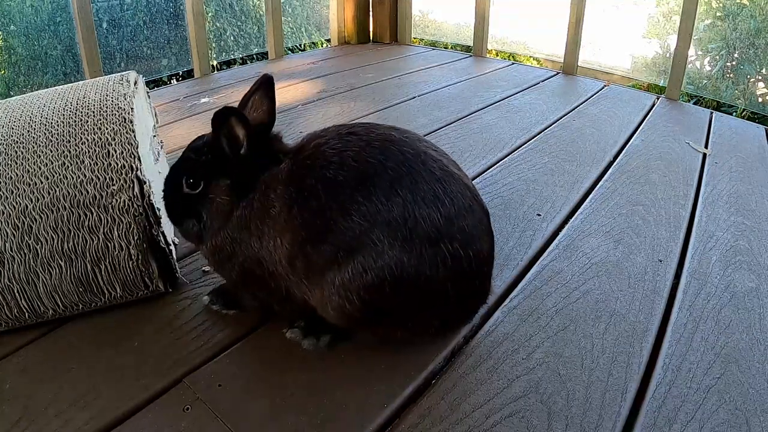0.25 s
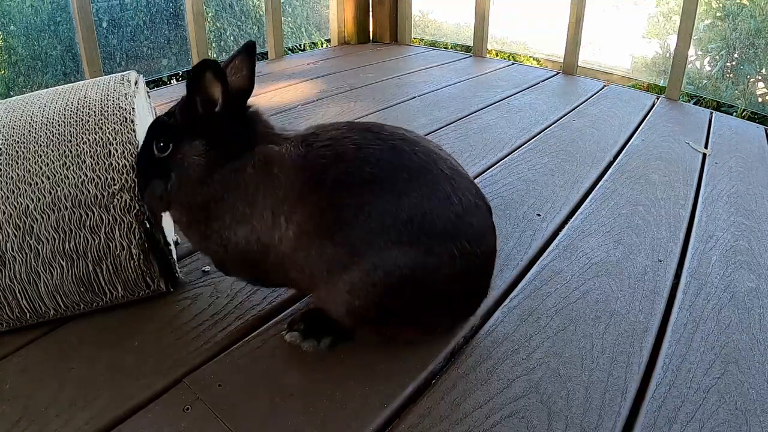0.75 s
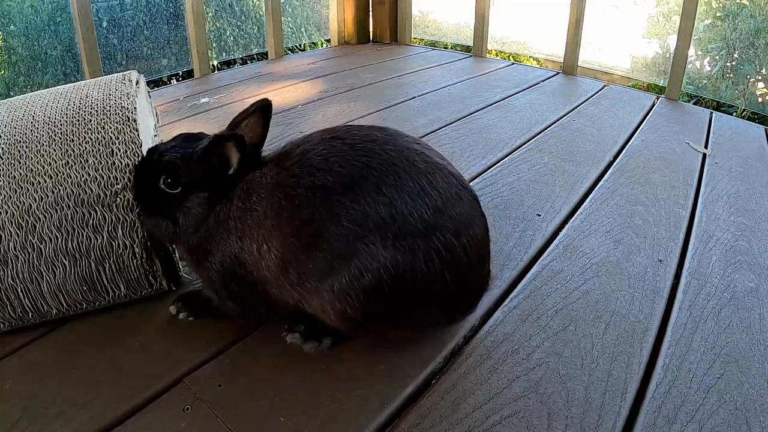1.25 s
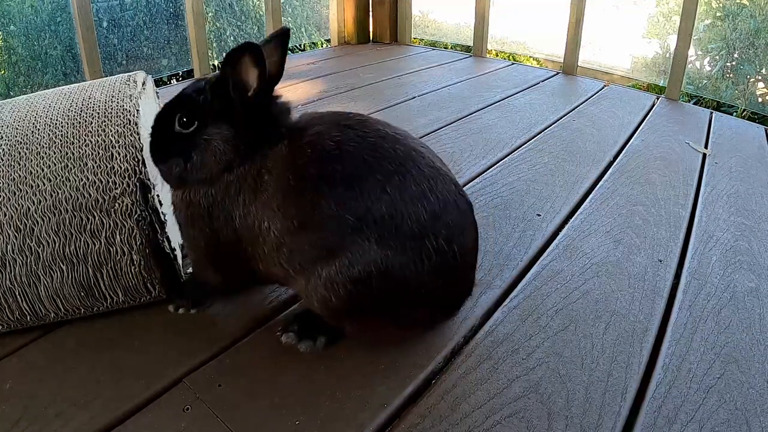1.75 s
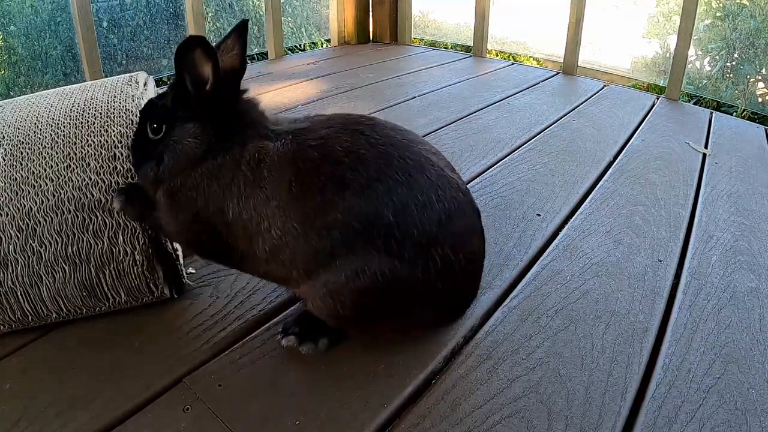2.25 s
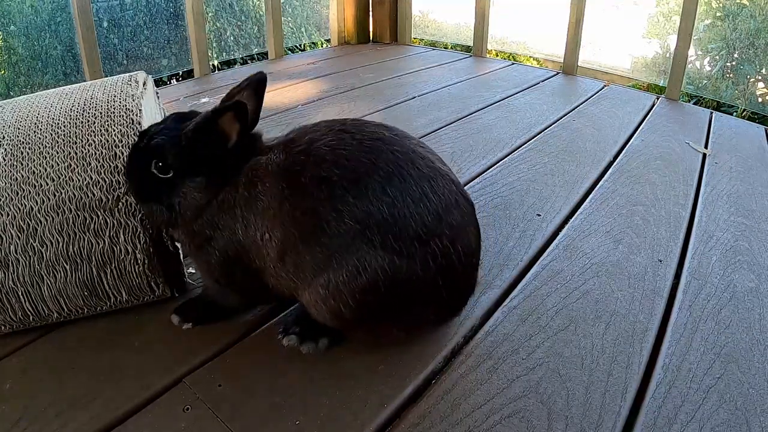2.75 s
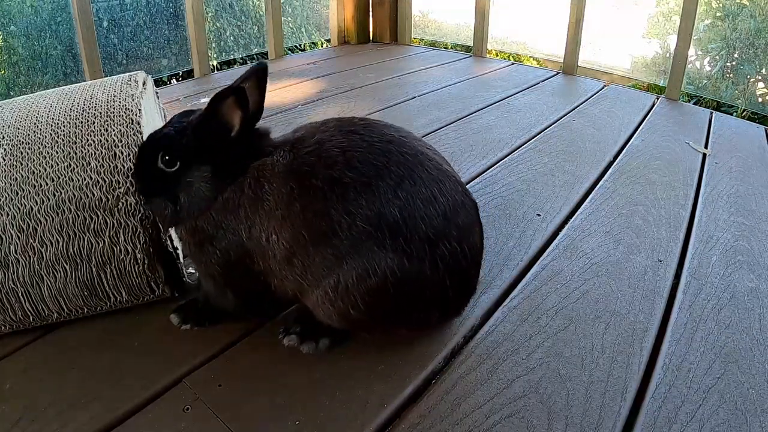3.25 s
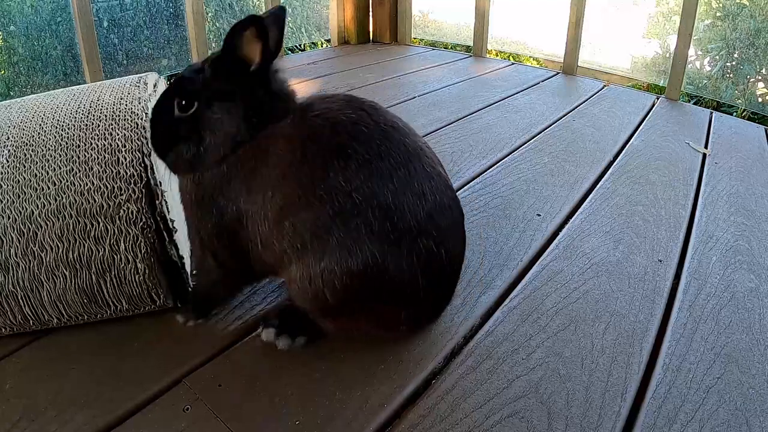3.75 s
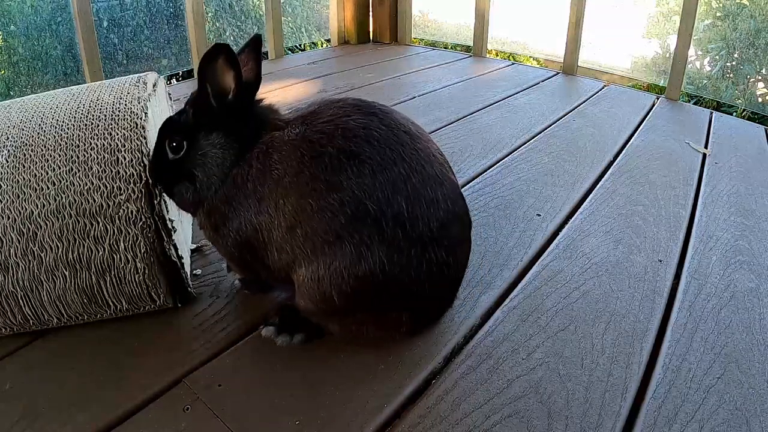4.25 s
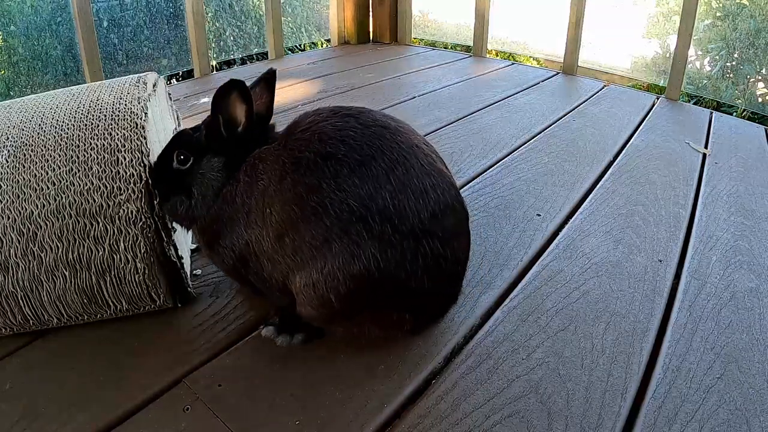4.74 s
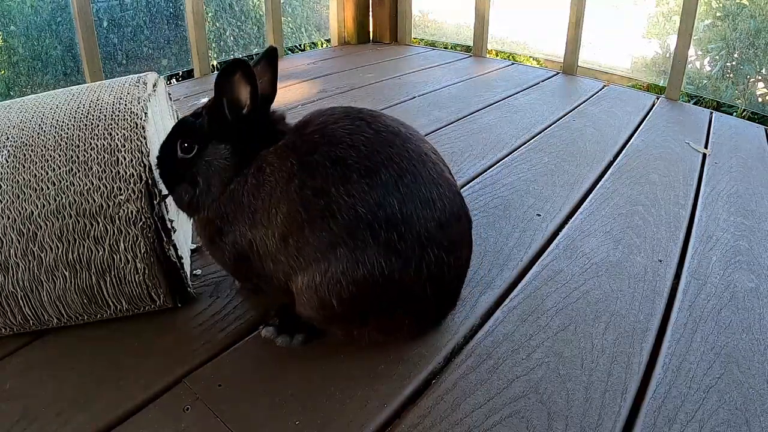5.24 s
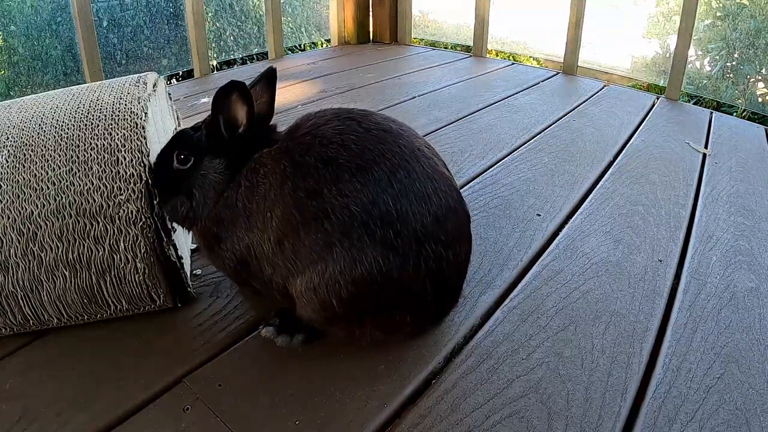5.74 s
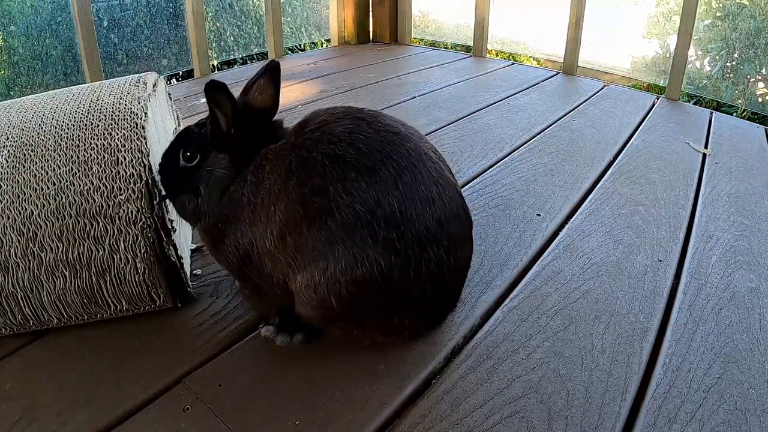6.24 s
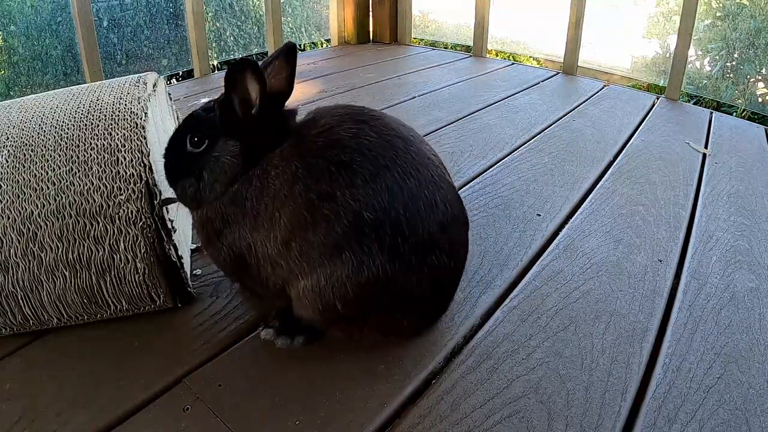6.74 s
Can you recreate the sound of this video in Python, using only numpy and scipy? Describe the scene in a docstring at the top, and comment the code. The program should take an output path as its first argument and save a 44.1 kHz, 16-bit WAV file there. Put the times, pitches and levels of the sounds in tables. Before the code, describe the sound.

A rabbit works at a hollow corrugated cardboard roll on an enclosed wooden deck. A brief scratch and soft rustle lead into a rapid burst of clawing with crisp snaps, then a lull, a second fast burst, and a few thumps on the boards. Afterwards only isolated light bites and knocks remain over a low outdoor hush. The microphone is close but muffled inside a closed case, so everything sounds boxy and dull.

```python
"""Rabbit digging at a cardboard roll

A rabbit claws and tears at a roll of corrugated cardboard on an enclosed wooden deck.
Each stroke is a shower of random fibre slips ringing the hollow roll; flutes snap with short bright clicks.
Thumps ring the deck boards as decaying sines; soft rustles and the brush of fur are shaped noise.
Behind lie a quiet outdoor hush and faint machine tones, all heard by a camera in a closed, muffling case."""
import sys
import numpy as np
from scipy import signal
from scipy.fft import rfft, irfft
from scipy.io import wavfile
from scipy.ndimage import uniform_filter1d

SR = 44100
rng = np.random.default_rng(int(sys.argv[2]) if len(sys.argv) > 2 else 0)


def master_out(mix):
    """Clip the mix to full scale and print it as 16-bit PCM to the path in sys.argv[1]."""
    frames = np.transpose(np.atleast_2d(mix))
    ceiling = np.clip(frames, -1, 1)
    pcm = np.round(ceiling * 32767).astype(np.int16)
    wavfile.write(sys.argv[1], SR, pcm)


N = 308259
SIZE = 4096  # samples in a filter's frequency grid
HZ = np.maximum(np.fft.rfftfreq(SIZE, 1 / SR), 1)
TIME = np.arange(N) / SR

# Boom of the roll at a 0 dB stroke, and its growth in dB per dB: light touches barely move it.
HOLLOW_DB, HOLLOW_GROWTH = 4, 0.1
# Paw and tooth strokes: pawing at the rim, two bouts of digging with nibbling and a tug between,
# then sliding down, nosing at the edge and single bites.
# Each row: landing time in seconds, drag length in seconds, tap level in dB, drag level in dB, grit in dB.
STROKES = [ (0.045, 0.031, -52, -33, -2), (0.115, 0.018, -30, -22, -5), (0.564, .012, -30, -37, -12),
           (0.579, .01, -26.5, -23, -6), (0.624, 0.028, -23, -30, -5.5), (0.699, 0.035, -19.5, -22, -3.5),
           (0.748, .035, -24.5, -25, -5), (0.826, 0.015, -22, -17.5, -6), (0.872, 0.013, -23.5, -22, -4.5),
           (0.918, 0.013, -23.5, -32.5, -4), (0.985, 0.039, -32.5, -26.5, -4),
           (1.046, .014, -29.5, -23, -3), (1.128, 0.0077, -35.5, -42.5, 3),
           (1.319, 0.069, -45.5, -47.5, -4), (1.557, 0.022, -43, -41.5, -4.5), (1.7, 0.019, -48, -28, -2),
           (1.772, 0.012, -26, -24.5, -4.5), (1.976, 0.0085, -43.5, -46, -0.5),
           (2.022, 0.0085, -31.5, -31, -4.5), (2.064, 0.014, -36, -18.5, -1.5),
           (2.096, 0.014, -39, -24.5, -1.5), (2.166, 0.0089, -31, -30, -4.5),
           (2.2125, 0.013, -18.5, -19, -4), (2.25, 0.013, -30, -22, -7.5), (2.288, 0.015, -31, -24.5, -5.5),
           (2.354, 0.034, -23, -31, -14.5), (2.423, 0.017, -25.5, -28.5, -3.5),
           (2.451, 0.012, -25.5, -20.5, -5), (2.6, 0.069, -53, -42.5, 7.5), (2.672, .012, -44, -31, -13),
           (2.744, 0.023, -36, -40, -11.5), (2.834, 0.06, -56, -33.5, -6.5), (2.91, .008, -41, -41.5, 4.5),
           (3.213, 0.035, -49, -34, -3), (3.623, 0.079, -48, -37.5, -5.5), (3.822, 0.0065, -22.5, -31, -7),
           (5.15, 0.041, -40.5, -34, -1), (6.179, 0.02, -31.5, -45.5, 1), (6.704, .03, -47, -36, 2),
           (6.782, 0.0095, -24.5, -30, -6)]


def scratching(slips_per_s=2000, scatter_db=3.5, rub=0.15, chatter_db=2,
               hiss_db=-59, hiss_growth=0.41, size=500):
    """A claw drags over the paper: fibres slip at random, harder as the stroke bites, over a fine rub."""
    track, hiss_power = np.zeros((2, N)), np.zeros(N)
    t = np.arange(-0.04, 0.22, 1 / SR)
    for s, drag_s, tap_db, drag_db, grit_db in STROKES:
        db = max(tap_db, drag_db)
        force = stroke_force(t, drag_s, tap_db - db, drag_db - db)

        jolt_db = scatter_db * np.clip(rng.standard_normal(len(t)), -2, 2)
        jolts = rng.choice([-1, 1], len(t)) * undb(jolt_db)
        slipping = rng.random(len(t)) < slips_per_s / SR
        slips = unit(jolts * slipping) + rub * rng.standard_normal(len(t))
        # over about 11 ms the slips release what the claw puts in
        slips /= np.sqrt(uniform_filter1d(slips ** 2, size) + 1e-9)
        # the claw catches and skips on the ridges
        slips *= undb(chatter_db * wander(t - t[0], 0.003))
        drag = unit(force * slips) * np.sqrt(np.mean(force ** 2))

        spot = cardboard(HOLLOW_DB + HOLLOW_GROWTH * db, grit_db)
        scrape = signal.fftconvolve(drag[None], spot, axes=1)
        # the claw's force sets the stroke's energy, however the slips happen to fall
        scrape *= np.linalg.norm(force) * np.linalg.norm(spot) / np.linalg.norm(scrape)
        add(track, s + t[0], undb(db) * scrape)
        # fur and paper hiss even under a light touch, so the hiss grows more slowly than the stroke
        hiss_gain = undb(hiss_db + hiss_growth * (db + grit_db))
        add(hiss_power, s + t[0], (hiss_gain * drag) ** 2)

    colour = response(spectrum([(1500, -19), (5000, -4), (7000, 11), (9000, -5.5), (12000, 7), (15500, -34)]))
    hiss = np.sqrt(hiss_power) * rng.standard_normal((2, N))
    return track + convolve(hiss, colour / np.linalg.norm(colour))


TAP_ATTACK_S, TAP_FALL_S = 0.0022, 0.01
SWELL_SHARE = 0.56  # a drag's rise time, as a share of its length
RELEASE_S, RELEASE_SHARE = 0.013, 0.26  # longer drags also let go more slowly


def stroke_force(t, drag_s, tap_db, drag_db):
    """The claw lands with a tap, bites harder as it drags, then lets go."""
    tap = undb(tap_db) * pulse(t, TAP_ATTACK_S, TAP_FALL_S)
    release_s = RELEASE_S + RELEASE_SHARE * drag_s
    drag = undb(drag_db) * pulse(t - drag_s, SWELL_SHARE * drag_s, release_s)
    return np.hypot(tap, drag)


# Tone of the cardboard as heard inside the case, before levelling.
# Each row: frequency in Hz, gain in dB.
CARDBOARD_TONE = [(25, -53), (70, -11), (170, -9.5), (340, -12.5), (500, -5), (800, -9), (1070, 2),
                  (1430, -11), (1950, -13), (2350, -26), (3300, -9), (5300, -15.5), (8500, -41.5),
                  (12000, -44), (15500, -63.5)]
# Resonances and notches of the roll and case.
# Each row: centre in Hz, width in Hz, gain in dB.
ROLL_RESONANCES = [(541.6, 70, 5), (757, 37, 5.5), (830, 22, -6), (893, 60, 3.5), (1097, 62, 4),
                   (1267, 58, 3), (2422, 200, 9), (3150, 280, 3.5), (3770, 110, -5.5), (3950, 300, -1.5),
                   (4280, 250, -10.5), (4540, 230, -0.5), (5700, 90, -11.5)]


def cardboard(hollow_db, grit_db, ripple_db=2.0, ripple_hz=45, scatter=0.73, scatter_s=0.0013, size=40):
    """Stereo response of one spot: broad faces boom, torn edges are gritty, each favours its own partials."""
    db = spectrum(CARDBOARD_TONE) + bumps(ROLL_RESONANCES)
    db -= 10 * np.log10(np.mean(undb(db) ** 2))
    db += spectrum([(120, 0.024), (350, hollow_db), (650, hollow_db), (950, 0), (1400, 0.014),
                    (2600, grit_db), (5000, grit_db), (9000, 0.95 * grit_db)])
    direct = response(db + ripple_db * wander(HZ, ripple_hz))

    # short waves bounce among the flutes and reach the two ports by different paths
    paths = diffuse(SIZE, split_hz=2350) * np.exp(-TIME[:SIZE] / scatter_s)
    paths /= np.sqrt(np.sum(paths ** 2) / 2)
    paths = convolve(paths, response(spectrum([(700, -24.5), (2500, 1.5), (8000, 3)])))
    spread = rfft(scatter * paths, axis=1) + 1
    # the bounces smear a click in time but leave each broad band its energy
    spread /= np.sqrt(uniform_filter1d(abs(spread) ** 2, size, axis=1))
    return convolve(irfft(spread, axis=1)[:, :SIZE // 2], direct)


# Flutes snapping and claws catching.
# Each row: start in seconds, level in dB, hollow boom in dB, grit in dB.
SNAPS = [(0.624, -34, -2, 4), (0.693, -36, -17, 12), (0.7025, -26.5, -1, 5.5), (0.708, -20.5, 6.5, -13),
         (0.731, -20.5, -17, -15), (0.7754, -23.5, 6.5, -2), (0.82, -28, -14, 5.5), (0.827, -25.5, -2, 7),
         (0.8345, -24.5, -9, 9.5), (0.9186, -18.5, 4, -26), (1.02, -34, 16.5, 9), (1.6989, -27, 3, 14),
         (2.063, -30, -15, 11), (2.0709, -32.5, 16.5, 17.5), (2.095, -20, -16, -3), (2.2244, -24, 10.5, 3),
         (2.305, -23, -3, -1), (2.3521, -28, 9, 0.5), (2.368, -28.5, 5, -2.5), (2.8527, -23, 8.5, -6),
         (2.9141, -35.5, 14, -6), (3.09, -56, 8, 14.5), (3.8219, -30.5, 0, -13.5), (5.187, -44, 10, 3),
         (6.783, -37, 16, -6)]


def snapping(ring_s=0.0051, tear=0.65, tear_s=0.0017):
    """A flute gives way: one push on the cardboard, and its last fibres part brightly right after."""
    track, t = np.zeros((2, N)), TIME[:SR // 100]
    bright = signal.butter(2, 1800, "highpass", fs=SR, output="sos")
    for s, db, hollow_db, grit_db in SNAPS:
        fibres = signal.sosfilt(bright, rng.standard_normal(len(t)) * np.exp(-t / tear_s))
        push = tear * fibres / np.linalg.norm(fibres)
        push[0] += 1
        snap = convolve(cardboard(hollow_db, grit_db), push / np.linalg.norm(push))
        # sets the energy as if the level were held for ring_s
        add(track, s, undb(db) * np.sqrt(ring_s * SR) * snap)
    return track


# Paws, body and roll landing on the boards.
# Each row: start in seconds, level in dB before the boards' gain, contact time constant in seconds.
THUMPS = [(0.138, -39, 0.00089), (0.768, -35.5, 0.0014), (1.779, -28, 0.0029), (1.895, -31, 0.0091),
          (2.302, -40, .0008), (2.912, -43.5, 0.00011), (3.255, -40.5, 0.0017), (3.725, -37, 0.0021),
          (3.789, -37, 0.0024), (3.822, -35, 0.00058), (3.84, -26.5, 0.0036), (5.2, -40.5, 0.00053),
          (5.443, -46, 0.003), (6.176, -40, 0.0023), (6.78, -41, 0.0003)]
# Ringing modes of the deck boards.
# Each row: nominal frequency in Hz, relative level in dB, 60 dB decay time in seconds.
BOARD_MODES = [(31, -10.5, .35), (56.9, -6, 0.44), (66.67, 3, 0.27), (85.5, 1, 0.3), (121, -3, 0.19),
               (156.3, -6.5, 0.21), (219, -1.5, 0.15), (259.4, 7.5, 0.068), (291.8, -0.5, 0.16),
               (386.5, -3.5, .13)]


def thumping(spot_db=1, detune=0.021, gain_db=8, build_cycles=0.59):
    """Blows ring the deck boards; the bass builds up late, and longer contact favours the lowest modes."""
    track, t = np.zeros(N), TIME[:SR // 2]
    for s, db, contact_s in THUMPS + rocking():
        ring = np.zeros(len(t))
        for hz, mode_db, t60 in BOARD_MODES:
            # each landing spot favours and detunes the modes a little differently
            favour, shift = rng.standard_normal(2)
            envelope = undb(mode_db + spot_db * favour - 60 * t / t60)
            build_up = 1 - np.exp(-t * hz / build_cycles)
            ring += envelope * build_up * np.sin(2 * np.pi * hz * (1 + detune * shift) * t)
        push = np.exp(-t / max(contact_s, 1e-4))
        thump = signal.fftconvolve(ring, push / push.sum())[:len(t)]
        add(track, s, undb(db + gain_db) * thump)
    return track


# Thump of a 0 dB stroke before the boards' gain, its growth in dB per dB of stroke, contact time.
ROCK_DB, ROCK_GROWTH, ROCK_CONTACT_S = -29, 0.62, 0.0027


def rocking():
    """Each stroke knocks the roll against the deck at its stronger part: more rows in the form of THUMPS."""
    rows = []
    for s, drag_s, tap_db, drag_db, _ in STROKES:
        peak_s = s + drag_s * (drag_db > tap_db)
        rows.append((peak_s, ROCK_DB + ROCK_GROWTH * max(tap_db, drag_db), ROCK_CONTACT_S))
    return rows


RUSTLE_ATTACK_S, RUSTLE_SAG_DB_PER_S, RUSTLE_RELEASE_S = 0.0023, 34, 0.025
# Soft, hoarse rustles at the roll.
# Each row: start in seconds, length in seconds, opening level in dB.
RUSTLES = [(0.324, .2, -35.5), (3.157, 0.012, -48)]
# Colour of the rustle, before levelling.
# Each row: frequency in Hz, gain in dB.
RUSTLE_COLOUR = [(100, -31), (420, -26), (600, -20.5), (880, -19.5), (1020, -2), (1300, -6.5),
                 (1450, -26.5), (1800, -22), (2400, -42.5), (3100, -26), (4000, -36.5), (5300, -30.5),
                 (7000, -63), (15000, -78)]
# Narrow resonances of the rustle.
# Each row: centre in Hz, width in Hz, gain in dB.
RUSTLE_PEAKS = [(556, 34, 11.5), (735, 44, 14), (1020, 36, 9), (1205, 44, 6), (1326, 31, 7), (1570, 55, 5),
                (1780, 60, 5.5), (3070, 98, 4.5), (4150, 150, 8)]


def rustling():
    """Soft, hoarse noise ringing a few narrow resonances: it starts quickly, sags and stops."""
    colour = response(spectrum(RUSTLE_COLOUR) + bumps(RUSTLE_PEAKS))
    noise = unit(convolve(rng.standard_normal(N), colour)[0])
    level = 0
    for s, length_s, db in RUSTLES:
        t = TIME - s
        held = np.clip(t, 0, length_s)
        sag = undb(db - RUSTLE_SAG_DB_PER_S * held)
        level = level + sag * pulse(t - held, RUSTLE_ATTACK_S, RUSTLE_RELEASE_S)
    return noise * level


# Brush level at a 0 dB stroke without grit, and its growth in dB per dB of stroke and grit.
BRUSH_DB, BRUSH_GROWTH = -47, 0.4
BRUSH_RISE_S, BRUSH_FALL_S = 0.02, 0.016
# Colour of fur on paper, before levelling.
# Each row: frequency in Hz, gain in dB.
BRUSH_COLOUR = [(1500, -22), (3300, 1), (5200, 6), (8500, -11), (12000, -18.5), (15500, -31)]


def brushing(flutter_db=3.0):
    """Fur sweeps over the paper around each stroke: a faint, bright swish, stronger on gritty edges."""
    power = 0
    for s, drag_s, tap_db, drag_db, grit_db in STROKES:
        gain = undb(BRUSH_DB + BRUSH_GROWTH * (max(tap_db, drag_db) + grit_db))
        sweep = pulse(TIME - s - drag_s / 2, BRUSH_RISE_S, BRUSH_FALL_S)
        power = power + (gain * sweep) ** 2
    noise = unit(convolve(diffuse(N), response(spectrum(BRUSH_COLOUR))))
    return noise * np.sqrt(power) * undb(flutter_db * wander(TIME, 0.0074))


DECK_T60_S, DECK_DB = 0.35, -11


def enclosure(x, treble_db=-3):
    """Floor, posts and roof return a short, slightly dulled echo, made from decaying noise."""
    t = np.arange(SR // 2) / SR
    tail = diffuse(len(t)) * undb(-60 * t / DECK_T60_S) * (1 - np.exp(-t / 0.0044))
    tail /= np.sqrt(np.sum(tail ** 2) / 2)
    tail = convolve(tail, response(spectrum([(1000, 0), (6000, treble_db)])))
    return undb(DECK_DB) * convolve(x, tail)


# A distant machine.
# Each row: start in seconds, mean frequency in Hz, level in dB, waver in dB.
HUM = [(0, 120, -59.5, 3.5), (0, 362, -70.5, -1.5), (3.9, 311, -64, 4)]


def humming(drift_hz=2):
    """Faint, distant machine tones: sines that waver in pitch and level."""
    out = 0
    for start, hz, db, waver_db in HUM:
        phase = 2 * np.pi * np.cumsum(hz + drift_hz * wander(TIME, 0.12)) / SR
        running = np.clip((TIME - start) / 0.11, 0, 1)
        level = undb(db + waver_db * wander(TIME, 0.15))
        out = out + running * level * np.sqrt(2) * np.sin(phase)
    return out


HUSH_DB = -50.5  # air before its rumble flickers
# Colour of the outdoor hush inside the case, before levelling.
# Each row: frequency in Hz, relative density in dB per Hz.
HUSH_COLOUR = [(25, -5.5), (80, 2.5), (110, -8.5), (150, -3), (255, -10), (330, -13.5), (480, -24),
               (850, -27.5), (1120, -9.5), (1500, -26), (2400, -39.5), (3400, -30), (4200, -37.5),
               (5300, -35), (8500, -64.5)]


def hush(flicker_db=2, hiss_db=-96):
    """Distant outdoor air and uneven rumble, gently swelling, over faint microphone hiss."""
    air = unit(convolve(diffuse(N, split_hz=3400), response(spectrum(HUSH_COLOUR))))
    rumble = signal.sosfilt(signal.butter(2, 350, fs=SR, output="sos"), air)
    air = air + rumble * (undb(flicker_db * wander(TIME, 0.051)) - 1)
    swell_db = 0.6 * wander(TIME, 0.4)
    return air * undb(HUSH_DB + swell_db) + undb(hiss_db) * rng.standard_normal((2, N))


# Difference between the two microphone ports.
# Each row: frequency in Hz, left minus right in dB, left lead in radians.
PORT_DIFFERENCES = [(59, 0.9, 0.15), (249.6, 0, 0.36), (555.6, 2.5, 0.5), (1270, 2, 0.18),
                    (1700, -1.5, 0.97), (2453, 4.5, -2), (3267, 9, -1), (4000, 5, 0.5), (4620, 1.5, 0.87),
                    (5200, -13.5, 2), (6170, -2, 3), (7430, 3, 4.5), (11640, 1.5, 3.5)]


def ports(x):
    """The case carries sound to its two ports with a different strength and delay at each frequency."""
    half_gain = undb(spectrum(PORT_DIFFERENCES, axis=1) / 2)
    half = half_gain * np.exp(0.5j * spectrum(PORT_DIFFERENCES, axis=2))
    pair = np.array([half, 1 / half])
    pair /= np.sqrt(np.mean(abs(pair) ** 2, axis=0))
    # centre the responses so that either port can lead, then remove the shared delay
    h = np.roll(irfft(pair), SIZE // 2, axis=1)
    return signal.oaconvolve(np.atleast_2d(x), h, axes=1)[:, SIZE // 2:SIZE // 2 + N]


def diffuse(count, split_hz=2200):
    """Noise from all sides: alike at both ports in the bass, unrelated in the treble."""
    mid, side = rng.standard_normal((2, count))
    side = convolve(side, response(-10 * np.log10(1 + (split_hz / HZ) ** 3)))[0]
    return np.array([mid + side, mid - side])


def pulse(t, rise, fall):
    """An envelope that grows exponentially to 1 at t = 0 and dies away."""
    return np.exp(np.minimum(t / max(rise, 1e-4), -t / max(fall, 1e-4)))


def wander(axis_values, step):
    """Random levels one step apart along time or frequency, joined by lines."""
    knots = np.arange(0, axis_values[-1] + step, step)
    return np.interp(axis_values, knots, rng.standard_normal(len(knots)))


def bumps(peaks):
    """Gain curve in dB of a set of resonances and notches."""
    return sum(db / (1 + (2 * (HZ - hz) / width) ** 2) for hz, width, db in peaks)


def spectrum(points, axis=1):
    """One column of a table, joined on a log-frequency axis."""
    table = np.array(points)
    return np.interp(np.log(HZ), np.log(table[:, 0]), table[:, axis])


def response(db):
    """The causal, minimum-phase impulse response of a gain curve in dB."""
    cepstrum = irfft(db * np.log(10) / 20)
    cepstrum[1:SIZE // 2] *= 2
    cepstrum[SIZE // 2 + 1:] = 0
    return irfft(np.exp(rfft(cepstrum)))


def convolve(x, h):
    """Filter x by h, keeping its length."""
    return signal.oaconvolve(np.atleast_2d(x), np.atleast_2d(h), axes=1)[:, :np.shape(x)[-1]]


def undb(db):
    """Decibels to gain."""
    return 10 ** (np.asarray(db) / 20)


def unit(x):
    """Scale to rms 1."""
    return x / np.sqrt(np.mean(x ** 2))


def add(track, s, sound):
    """Mix a sound in from time s, dropping whatever falls outside the track."""
    start = int(s * SR)
    sound, start = sound[..., max(-start, 0):], max(start, 0)
    track[..., start:start + sound.shape[-1]] += sound[..., :max(N - start, 0)]


def scene():
    """The rabbit at work, the deck's echo and the outdoors, all heard through the case."""
    work = scratching() + snapping() + rustling() + brushing()
    return ports(work + thumping() + enclosure(work) + humming() + hush())


def record(dry):
    """The camera cuts the top with a steep low-pass."""
    top_hz = 15500
    return signal.sosfilt(signal.ellip(8, 0.2, 70, top_hz, fs=SR, output="sos"), dry)


dry = scene()
out = record(dry)
master_out(out)
```